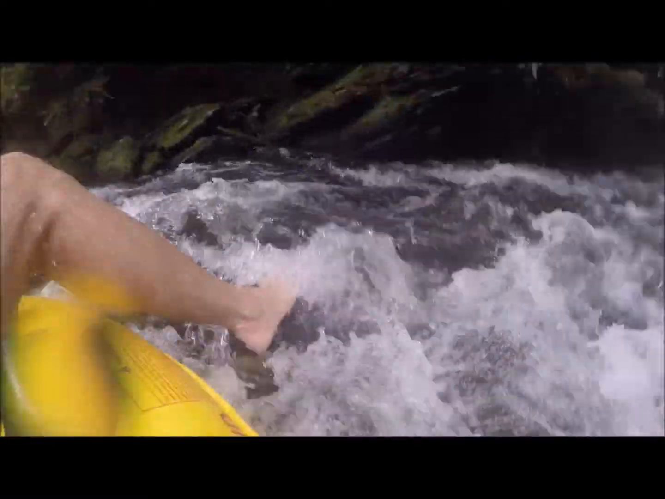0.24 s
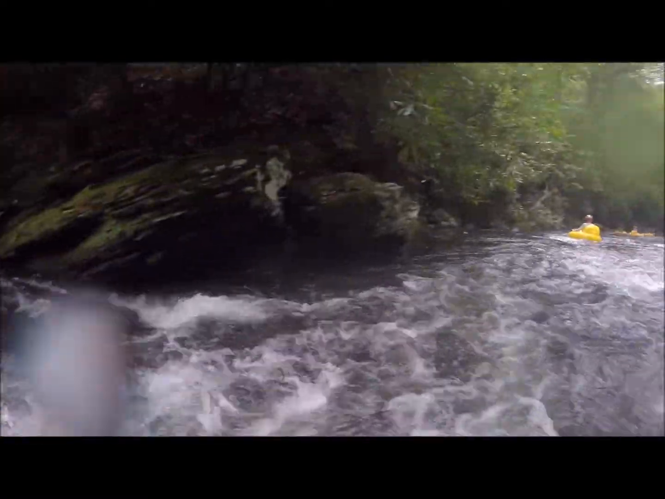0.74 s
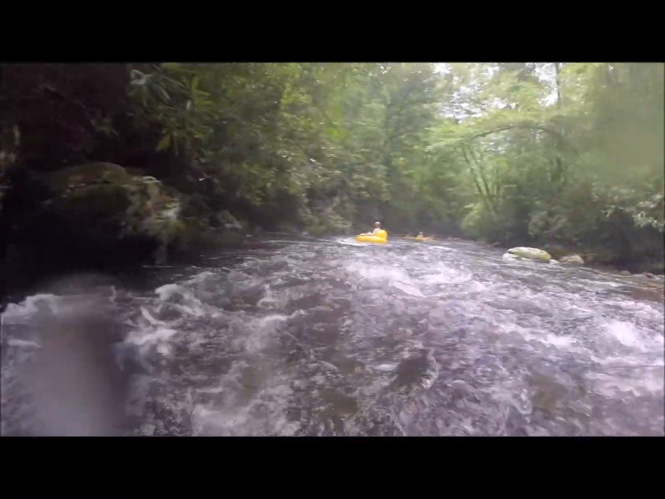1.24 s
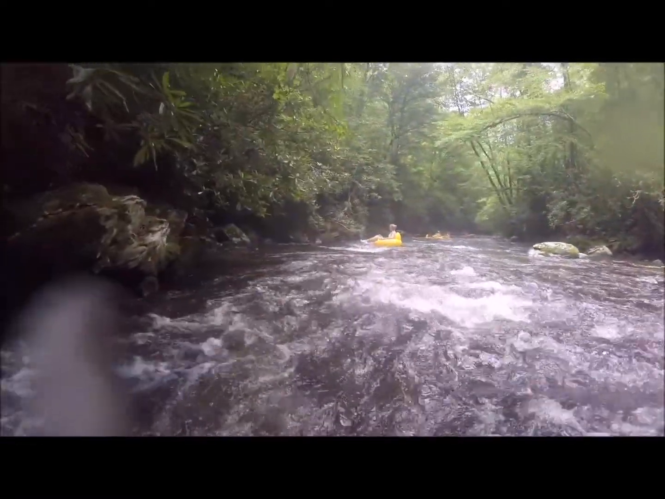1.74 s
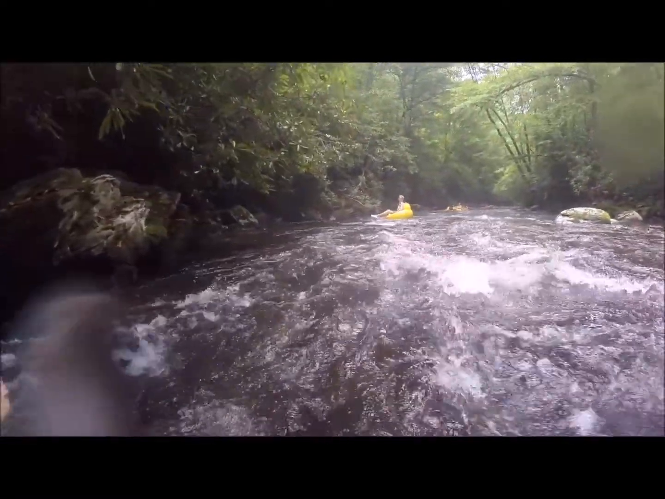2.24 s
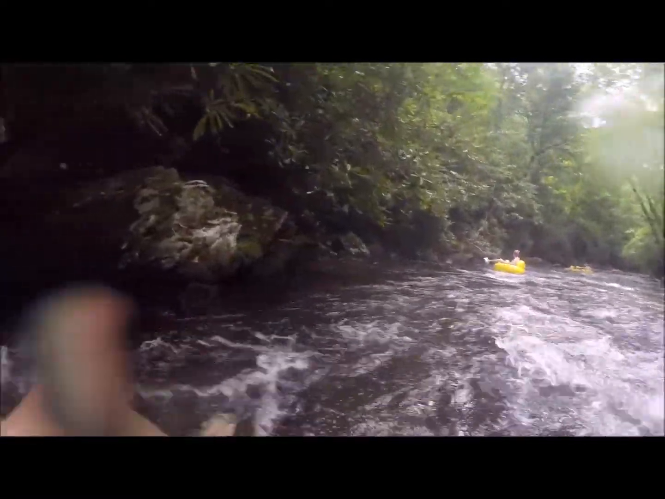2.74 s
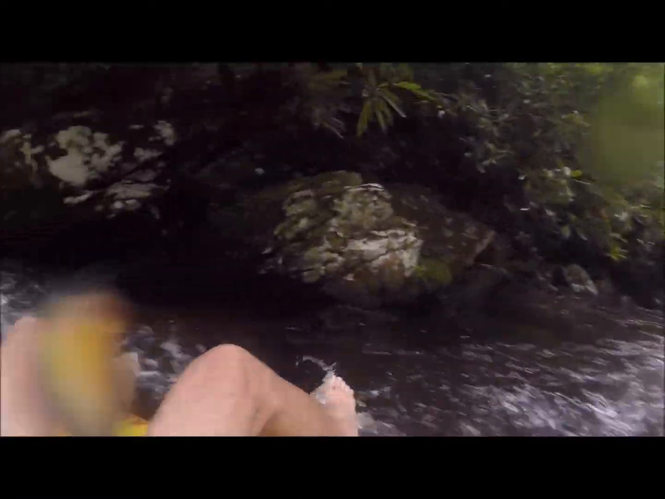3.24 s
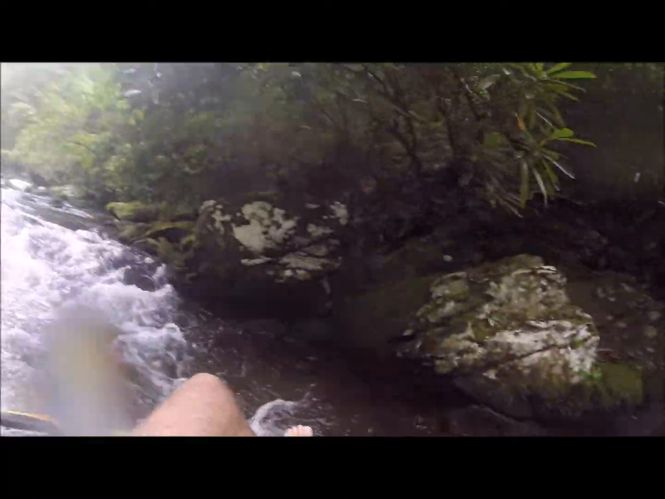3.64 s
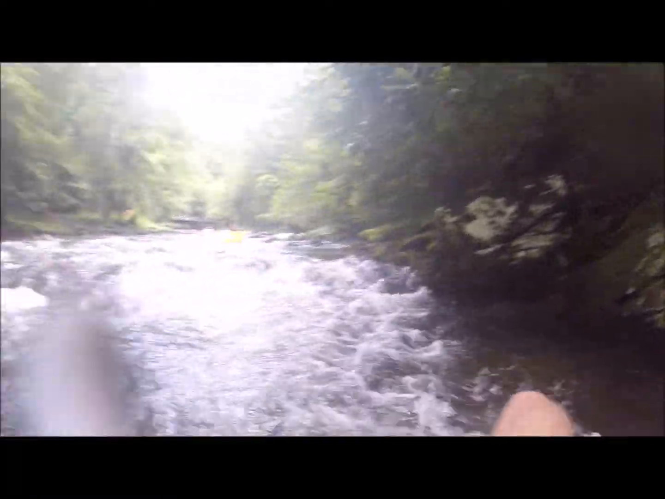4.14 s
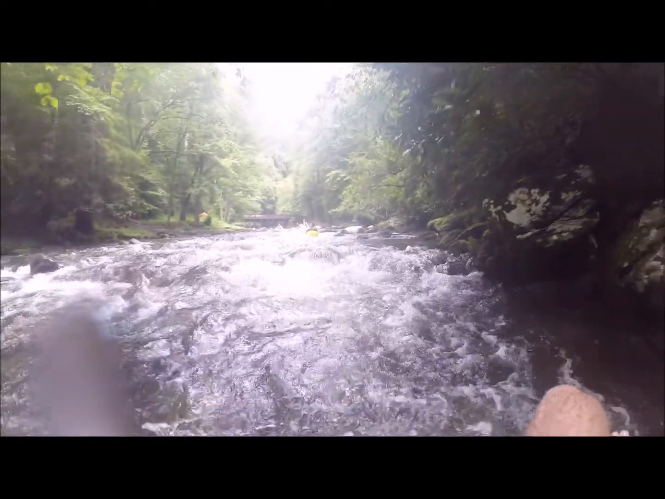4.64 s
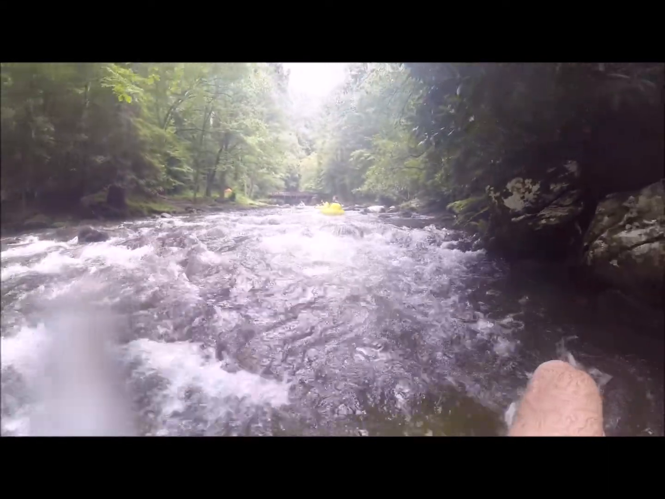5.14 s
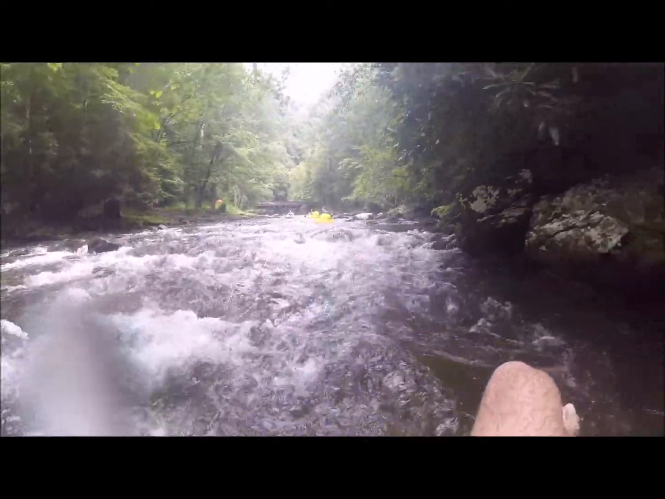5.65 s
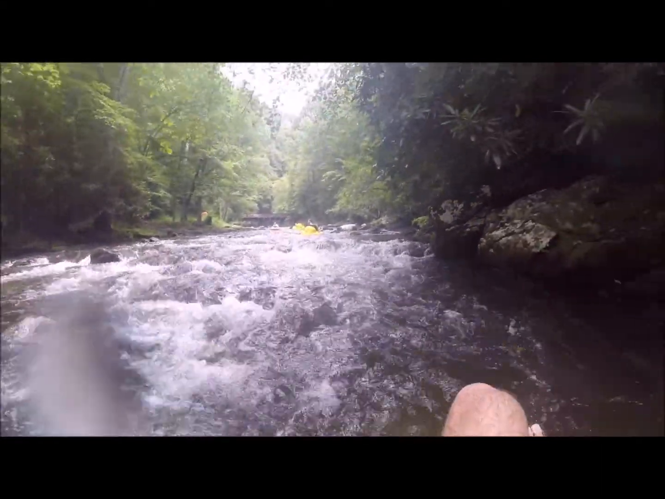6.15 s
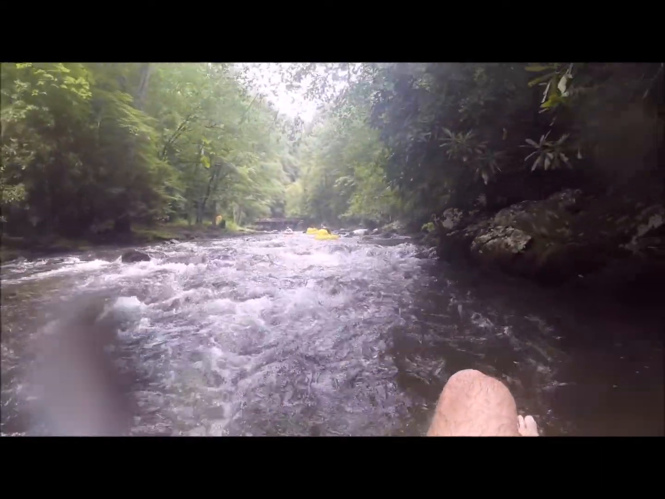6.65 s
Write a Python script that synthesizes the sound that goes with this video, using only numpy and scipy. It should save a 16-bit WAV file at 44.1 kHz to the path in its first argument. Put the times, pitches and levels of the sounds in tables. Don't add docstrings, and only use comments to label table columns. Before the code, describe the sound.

White water roars and fizzes close by, muffled by a sealed housing, with low sloshing thumps and one sharp, loud smack early on.

```python
import sys
import numpy as np
from scipy import signal
from scipy.fft import rfft, irfft
from scipy.io import wavfile
from scipy.ndimage import uniform_filter1d

SR = 44100
rng = np.random.default_rng(int(sys.argv[2]) if len(sys.argv) > 2 else 0)


def dump_mix(stems):
    frames = np.atleast_2d(stems).T
    limited = np.clip(frames, -1, 1)
    pcm = np.round(limited * 32767).astype(np.int16)
    wavfile.write(sys.argv[1], SR, pcm)


def boost(x):
    u = np.asarray(x, float) / 20
    return 10 ** u


N = 304290

SMACK_S = 1.33167


def evened(x):
    return x / np.sqrt(np.mean(x ** 2) + 1e-20)


def read(points, hz):
    f, value = np.transpose(points)
    return np.interp(np.log(hz + 1), np.log(f + 1), value)


def add(mix, s, sound):
    part = mix[round(s * SR):][:len(sound)]
    part += sound[:len(part)]


def humps(t, events):
    return sum(height * np.exp(-((t - s) / half) ** 2) for s, height, half in events)


def bubble(hz, cycles, glide):
    u = np.arange(int(3 * cycles * SR / hz) + 8) * hz / SR / cycles
    envelope = 2 * u * np.exp(1 - 2 * u)
    return envelope * np.sin(2 * np.pi * cycles * u * (1 + glide * u))


def bubbles(per_s, cycles, spread_db, count):
    strength = boost(spread_db * np.minimum(rng.exponential(1, N), 4))
    bursts = strength * (rng.random(N) < per_s / SR)
    kind = rng.integers(0, count, N)
    out = np.zeros(N)
    for k, hz in enumerate(np.geomspace(500, 14000, count)):
        ring = bubble(hz, cycles, glide=.08)
        ring = ring / np.linalg.norm(ring) * np.sqrt(hz)
        out += signal.oaconvolve(bursts * (kind == k), ring)[:N]
    return evened(out)


def rapids():
    # t/s, roar/dB, spray/dB
    course = [(0.0, -43.5, -47), (0.2, -40, -42), (0.45, -43.5, -48.5), (0.7, -42, -48.5),
              (0.9, -41.5, -49.5), (1.2, -47, -54), (1.8, -47, -53), (2.25, -47.5, -52.5), (2.55, -51, -55),
              (2.9, -49.5, -53), (3.35, -48, -54.5), (3.65, -45, -54.5), (3.9, -49, -55.5),
              (4.7, -49.5, -54.5), (5.15, -49, -55), (5.5, -51, -54), (6.0, -52, -56.5), (6.9, -52.5, -58)]
    # from f/Hz, to f/Hz
    bands = [(1000, 4000), (150, 900), (4500, 7000), (7500, 14000)]
    # f/Hz, level/dB per Hz
    housing = [(170, -3), (600, -7.5), (1100, -5), (2700, 0.8), (3350, -4), (4050, -11.5), (4450, -11.5),
               (4750, -6), (5150, -7), (5700, -3.5), (6350, -7), (6750, -16), (9600, -20.5), (15000, -34)]
    # t/s, level/dB
    film = [
        (0, 1),
        (.9, -2.5),
        (1.9, -1.5),
        (2.4, 3),
    ]

    near = .45
    hiss = rng.standard_normal(N)
    close = bubbles(4000, cycles=5., spread_db=-0.5, count=36)
    raw = np.sqrt(1 - near) * hiss + np.sqrt(near) * close
    hz, t, z = signal.stft(raw, SR, nperseg=512, noverlap=384)
    z /= np.sqrt(uniform_filter1d(np.mean(abs(z) ** 2, 1), size=9))[:, None]

    shape_db = read(housing, hz)
    s, roar_db, spray_db = np.transpose(course)
    churn_db = -54.5 + .3 * (roar_db + 51)
    mist_db = -64 + 0.83 * (spray_db + 54.5)
    levels = [roar_db, churn_db, spray_db, mist_db]
    field, centre = [], []
    for (lo, hi), level in sorted(zip(bands, levels), key=lambda pair: pair[0][0]):
        inside = (hz >= lo) & (hz < hi)
        band_db = 10 * np.log10(np.sum(boost(shape_db[inside]) ** 2))
        field.append(np.interp(t, s, level) - band_db)
        centre.append(np.log(lo * hi) / 2)
    place = np.interp(np.log(hz + 1), centre, range(len(bands)))
    share = np.maximum(1 - abs(place[:, None] - np.arange(len(bands))), 0)

    patches, gusts = rng.standard_normal((2, len(hz), len(t)))
    patches = evened(uniform_filter1d(uniform_filter1d(patches, size=6, axis=0), size=20, axis=1))
    gusts = evened(uniform_filter1d(uniform_filter1d(gusts, size=60, axis=0), size=5, axis=1))

    notch_hz, notch_width_hz = 3940, 720
    notch = np.exp(-((hz - notch_hz) / notch_width_hz) ** 2)
    z *= boost(np.outer(notch, np.interp(t, *np.transpose(film))))
    ring_hz, ring_width_hz = 2600, 440
    ring = np.exp(-((hz - ring_hz) / ring_width_hz) ** 2)
    ring_db = .5 * np.interp(t, s, roar_db - spray_db - 6.)
    z *= boost(np.outer(ring, ring_db))
    z *= boost(shape_db[:, None] + share @ field + 0.77 * patches + 0.29 * gusts - 1.63)
    water = signal.istft(z, SR, nperseg=512, noverlap=384)[1][:N]

    hz = np.fft.rfftfreq(N, 1 / SR)
    low_cut = 1 / np.sqrt(1 + (181.0 / (hz + 1)) ** 8)
    return irfft(rfft(water) * low_cut, N)


def lumps(tone, db):
    colour = boost(read(tone, np.fft.rfftfreq(N, 1 / SR)))
    low = irfft(rfft(rng.standard_normal(N)) * colour, N)
    return low / np.sqrt(uniform_filter1d(low ** 2, size=13000)) * boost(db)


def buffeting():
    # f/Hz, level/dB per Hz
    heave_tone = [(2.4, -27), (4.0, 9), (21, 7), (29, 3.5), (40, -13), (52, -39), (88, -120)]
    # f/Hz, level/dB per Hz
    slosh_tone = [(25, -22), (42, 1.3), (85, -6.5), (150, -9.5), (210, -30.5), (400, -80)]
    # t/s, peak level/dB, half length/s
    surges = [(0.417, -43, 0.1), (0.782, -50, 0.12), (1.128, -46.5, 0.091), (1.46, -40, .05),
              (1.71, -38, 0.066), (2.228, -40.5, 0.086), (2.603, -45.5, 0.24), (3.0, -39, 0.051),
              (3.506, -40, .12), (3.787, -43, .07), (4.075, -39.5, 0.14), (4.55, -46.5, 0.13),
              (5.48, -56, 0.06), (5.737, -52.5, .07), (6.1, -55, .15), (6.52, -46.5, 0.18)]
    # t/s, extra slosh level/dB, half length/s
    slops = [
        (.15, 4, .1),
        (1.05, 3, .15),
        (2.24, 5.5, 0.11),
        (3.95, 3, .07),
        (4.75, -2.5, .15),
        (5.95, 4.5, .12),
        (6.33, 3, .08),
        (6.68, 4.5, .08),
    ]
    calm_db = -54
    t = np.arange(0, N / SR + .01, .005)
    power = boost(calm_db) ** 2 + humps(t, [(s, boost(db) ** 2, half) for s, db, half in surges])
    heave_db = 10 * np.log10(power)
    slosh_db = -58.5 + 0.17 * (heave_db - calm_db) + humps(t, slops)
    fine = np.arange(N) / SR
    heave = lumps(heave_tone, np.interp(fine, t, heave_db))
    return heave + lumps(slosh_tone, np.interp(fine, t, slosh_db))


def droplets():
    # t/s, peak level/dB, f/Hz
    spray_drops = [(0.187, -39, 9260), (0.5484, -51, 8550), (0.595, -46, 8700), (0.6484, -44, 8450),
                   (0.6555, -40, 10500), (0.8076, -39, 11500), (0.8345, -41, 8930), (1.2624, -51, 9190),
                   (1.9004, -53, 8220), (1.9974, -46, 10100), (2.0228, -38, 10400), (2.0364, -49.5, 8220),
                   (2.1116, -45, 8880), (2.2937, -45, 13000), (2.4409, -43, 11500), (2.4793, -45, 8050),
                   (2.4954, -44, 8090), (2.5755, -50.5, 8570), (3.1183, -50, 8660), (3.3598, -50, 8700),
                   (4.4258, -46, 9310), (4.4374, -47, 8700), (4.6104, -54, 8230), (4.7197, -48, 8370),
                   (5.6904, -53, 8090), (5.7294, -49, 8900), (6.3854, -55, 8440), (6.5136, -54, 8640)]
    # t/s, peak level/dB, f/Hz
    plops = [(0.0433, -27.5, 5760), (0.1184, -30, 4620), (0.209, -31, 5960), (0.595, -29, 6020),
             (0.833, -31, 6090), (2.474, -31.5, 5640), (2.4942, -31, 6000), (2.5162, -35, 4780),
             (2.6154, -36, 4800), (3.1896, -38, 5660), (3.5143, -36, 3790), (3.8237, -42, 5590),
             (4.4373, -34, 5570), (4.4667, -39, 5310), (4.9397, -44, 5470), (5.4804, -38, 6060),
             (6.557, -40, 5700)]
    # t/s, peak level/dB, f/Hz, length/cycles
    gulps = [
        (.133, -37, 205, 2.6),
        (.044, -37, 820, 4.),
        (.151, -40, 1400, 5.),
        (.142, -43, 560, 5.),
    ]
    out = np.zeros(N)
    for s, db, hz in spray_drops:
        add(out, s + .001, boost(db + 0.5) * bubble(hz, cycles=2.6, glide=0.038))
    for s, db, hz in plops:
        add(out, s, boost(db - 4.5) * bubble(hz, cycles=6.8, glide=0.013))
    for s, db, hz, cycles in gulps:
        add(out, s, boost(db) * bubble(hz, cycles, glide=-0.095))
    return out


def ducking():
    look_ahead_s, let_go_s = .0145, 0.038
    clamp_db, clamp_more_db = -13, -10
    duck_db, recover_db_per_s = -17.5, 17.5
    t = np.arange(N) / SR - SMACK_S
    slow_db = np.minimum(duck_db + recover_db_per_s * t, 0)
    grip_s = [-look_ahead_s - .0015, -look_ahead_s, .003, let_go_s]
    grip_db = np.interp(t, grip_s, [0, clamp_db, clamp_db + clamp_more_db, duck_db])
    return boost(np.where(t < let_go_s, grip_db, slow_db))


def smack():
    # f/Hz, level/dB, t60/s
    port = [(1650, 2, 0.0068), (2780, -14.5, 0.016), (3310, 0, 0.003), (4320, -15, 0.0046),
            (5330, -8.5, 0.0048), (8900, -18, 0.0028), (12600, -22, 0.003)]
    # f/Hz, level/dB, t60/s
    shell = [(1390, -33, .025), (2175, -28, .04), (2330, -30, .03), (4775, -42, .035), (8300, -46, .018)]
    t = np.arange(SR // 5) / SR
    pull = -1.1 * np.exp(-(t / 0.0016) ** 1.13)
    rings = np.zeros(len(t))
    for hz, db, t60 in [*port, *shell]:
        rings -= boost(db - 60 * t / t60) * np.cos(2 * np.pi * hz * t - .9)
    rough = np.diff(uniform_filter1d(rng.standard_normal(len(t) + 1), size=4))
    spatter = boost(-35 - 60 * t / 0.016) * rough

    leak_hz, damping = 14., .88
    w = 2 * np.pi * leak_hz
    leak = signal.bilinear([1, 0, 0], [1, 2 * damping * w, w ** 2], SR)
    blow = signal.lfilter(*leak, pull + rings + spatter)
    out = np.zeros(N)
    add(out, SMACK_S - 3 / SR, .6 * np.hanning(6)[1:-1])
    add(out, SMACK_S, boost(-2) * blow)
    return out


def scene():
    water = rapids() + buffeting() + droplets()
    below_edge = np.fft.rfftfreq(N, 1 / SR) < 15290
    water = irfft(rfft(water) * below_edge, N)
    return (water * ducking() + smack())[None]


def bridged(x, count):
    # t/s, fade out/s, hold/s, level/dB
    lost = [(.138, .006, .003, -20), (.568, .007, .003, -20), (.910, .007, .002, -23),
            (.974, .006, .002, -22), (1.038, .006, .002, -21), (1.121, .006, .005, -19),
            (1.954, .007, .003, -22), (2.039, .002, .005, -20), (2.188, .006, .004, -9),
            (3.702, .007, .005, -20), (4.294, .002, .009, -44), (5.922, .007, .004, -20),
            (6.534, .002, .010, -36)]
    fade_in_s = .0065
    out, n = x.copy(), np.arange(2048)
    for s, fall, hold, db in lost:
        start = round(s * SR) - 1024
        piece = x[start:start + 2048]
        z = rfft(piece[512:1536] * np.hanning(1024), 2048)
        tops = signal.argrelmax(abs(z), order=8)[0]
        strength = abs(z[tops]) * np.cbrt(tops)
        tops = tops[np.argsort(strength)[-count:]]
        turning = np.exp(2j * np.pi * np.outer(n - 512, tops) / 2048)
        tones = (z[tops] / 256 * turning).real.sum(1)
        tones = .85 * (tones - uniform_filter1d(tones, size=100))
        slow = uniform_filter1d(uniform_filter1d(piece, size=50), size=50)
        dip_s = [-fall, 0, hold, hold + fade_in_s]
        kept = boost(np.interp((n - 1024) / SR, dip_s, [0, db, db, 0]))
        out[start:start + 2048] = slow + kept * (piece - slow) + np.sqrt(1 - kept ** 2) * tones
    return out


def band_limit(x):
    return signal.sosfilt(signal.butter(12, 16580, fs=SR, output="sos"), x)


def record(dry):
    clipped = np.clip(dry[0], -.92, .92)
    soft = signal.filtfilt(*signal.butter(3, 10800, fs=SR), clipped)
    near_smack = np.exp(-((np.arange(N) / SR - SMACK_S) / .004) ** 4)
    mic = dry[0] + near_smack * (soft - dry[0])
    top_cut = signal.firwin(255, 16500, window=("kaiser", 9), fs=SR)
    mic = signal.oaconvolve(mic, top_cut, "same")
    return band_limit(bridged(mic, count=8)[None])


dry = scene()
out = record(dry)
dump_mix(out)
```